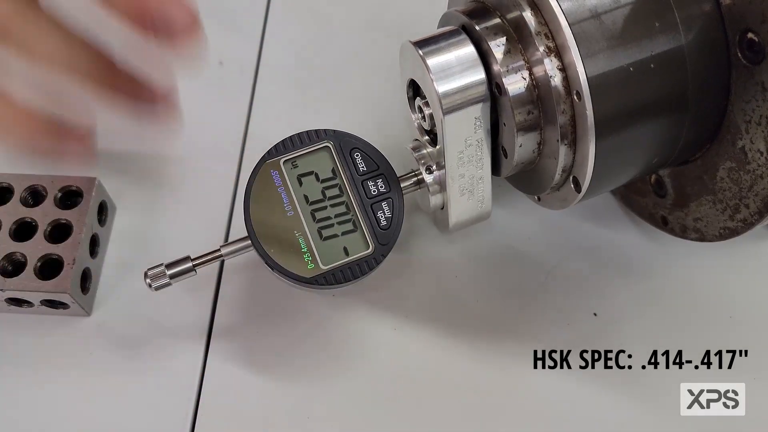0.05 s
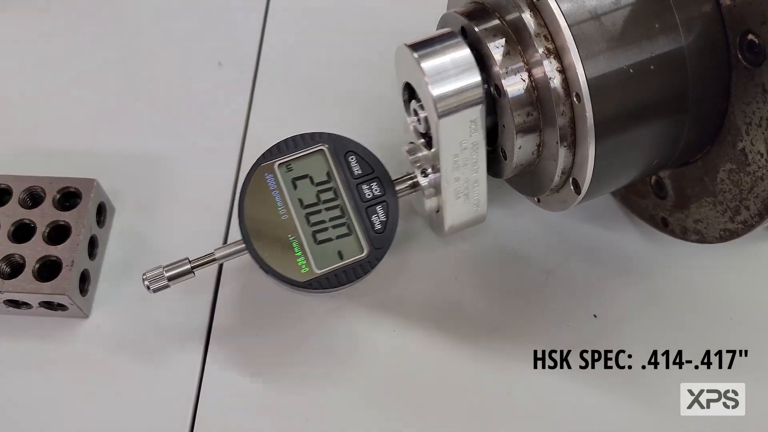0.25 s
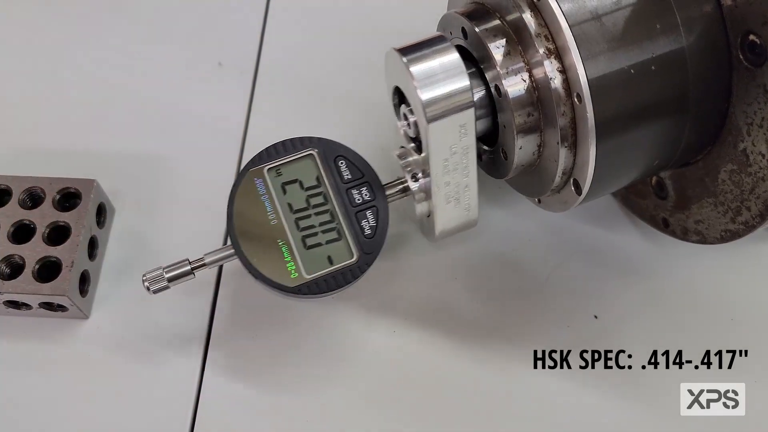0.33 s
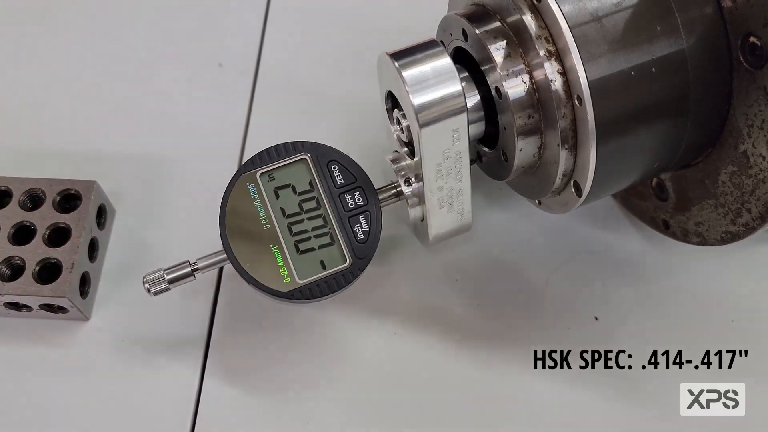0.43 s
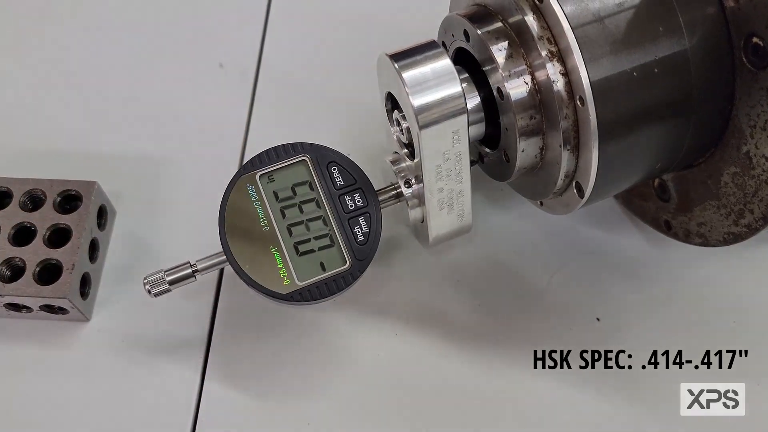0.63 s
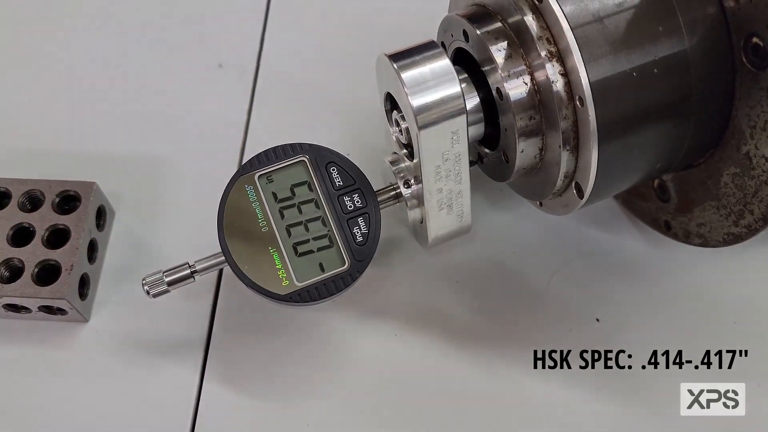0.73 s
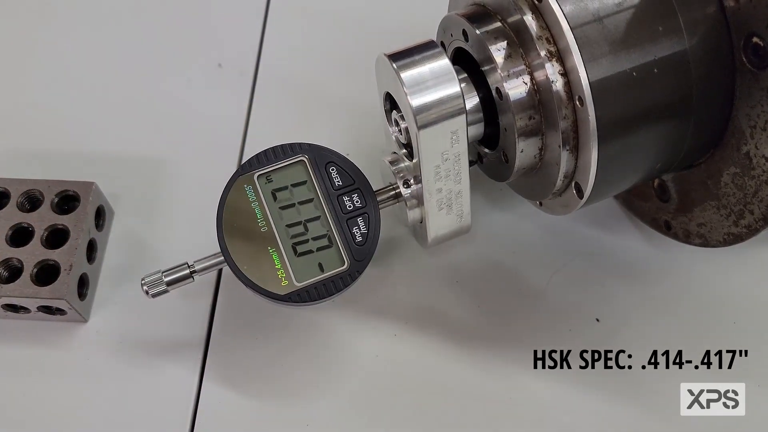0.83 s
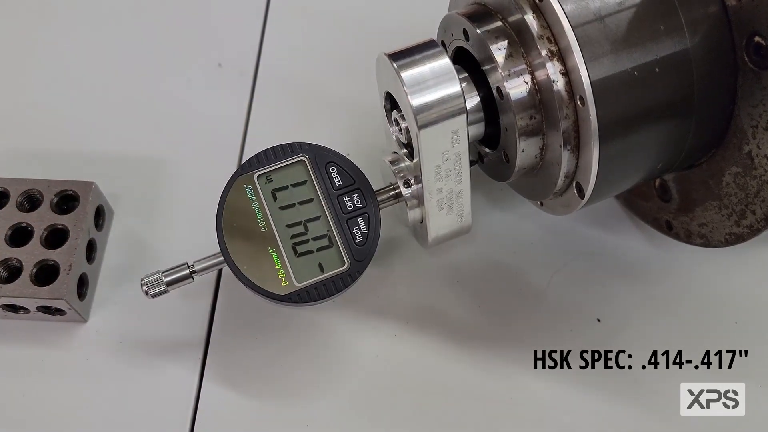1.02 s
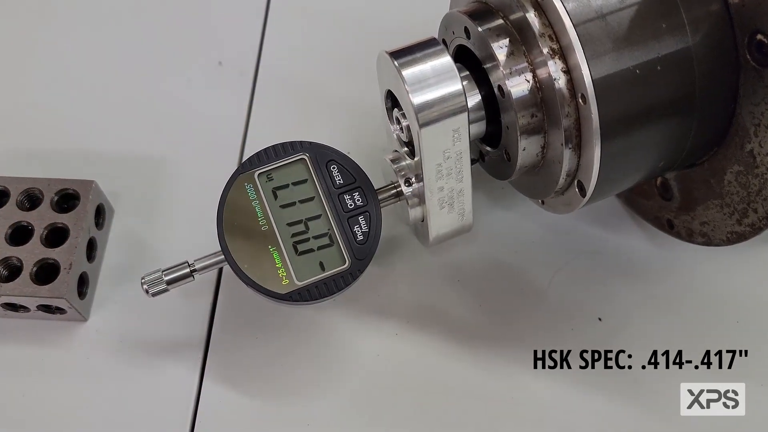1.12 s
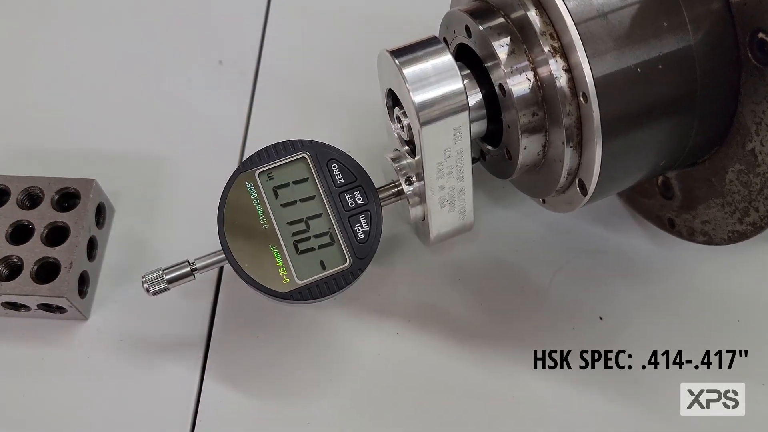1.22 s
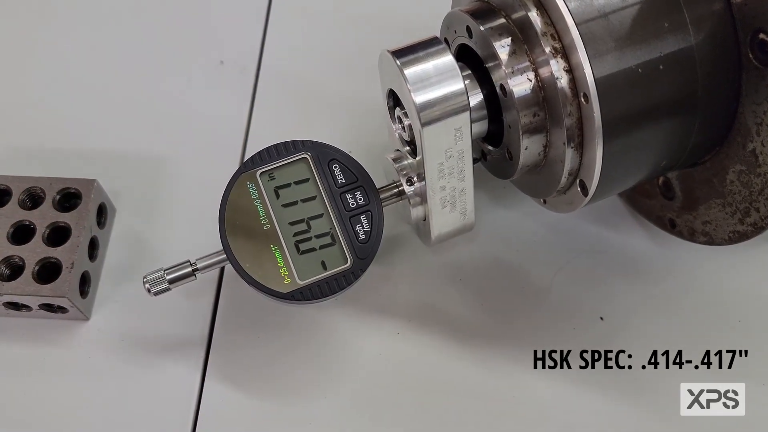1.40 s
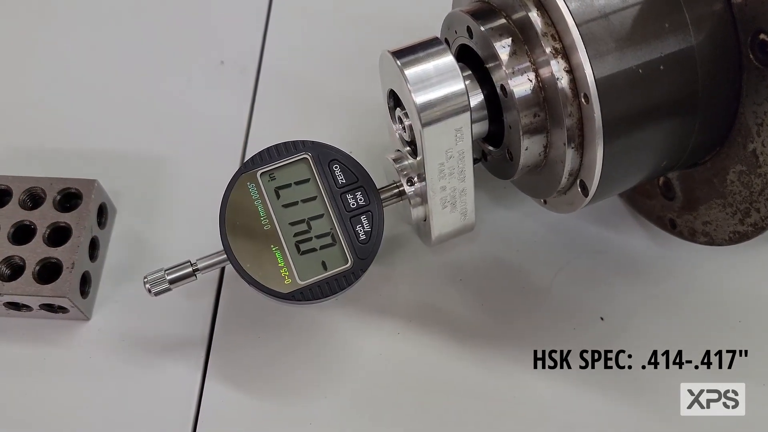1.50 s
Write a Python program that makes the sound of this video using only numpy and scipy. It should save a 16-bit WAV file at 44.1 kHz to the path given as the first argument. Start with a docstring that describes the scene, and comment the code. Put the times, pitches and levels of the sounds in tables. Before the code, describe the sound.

Close stereo pickup of one compressed-air clamp stroke in a quiet workshop; a valve clack and rising hiss lead into a heavy metal bang and rebounds, then a small air spit, a bench knock and low hum.

```python
"""A pneumatic clamp fires once on a workshop bench: a valve clacks, air hisses up, the piston slams home
and rebounds, the exhaust spits and the bench knocks again, while the room rings over a faint hum of machinery.
Air is shaped turbulent noise, thuds and steel strikes are sums of decaying modes, clacks are noise bursts;
bench reflections, a diffuse tail and a steady two-channel background surround them."""
import sys
import numpy as np
from scipy import signal
from scipy.fft import rfft, irfft
from scipy.io import wavfile
from scipy.ndimage import uniform_filter1d

SR = 44100
rng = np.random.default_rng(int(sys.argv[2]) if len(sys.argv) > 2 else 0)


def transcribe(u):
    """Save the signal u as a 16-bit wav file named by the first command-line argument.

    u: samples, shape (n,) or (channels, n), limited to [-1, 1]; the rate is SR.
    q: integer samples, one column per channel.
    """
    v = np.clip(np.atleast_2d(u).T, -1, 1)
    q = np.round(v * 32767).astype(np.int16)
    wavfile.write(sys.argv[1], SR, q)


N = 68355  # length in samples


def gain_of(db):
    """Amplitude ratio of a level: 20 dB is a factor of ten."""
    return 10 ** (np.asarray(db) / 20)


def evened(x):
    """Normalisation to unit rms, so that a level can be set afterwards."""
    return x / np.sqrt(np.mean(x ** 2) + 1e-20)


def read(points, hz):
    """Interpolation of a curve on a logarithmic frequency axis, as pitch is heard."""
    f, value = np.transpose(points)
    return np.interp(np.log(hz + 1), np.log(f + 1), value)


def add(mix, s, sound):
    """Superposition: the sound is summed into the mix from s seconds on."""
    part = mix[round(s * SR):][:len(sound)]
    part += sound[:len(part)]


def noise(colour, size):
    """Spectral shaping: white noise filtered to the given colour, at unit rms."""
    gain = gain_of(read(colour, np.fft.rfftfreq(size, 1 / SR)))
    return evened(irfft(rfft(rng.standard_normal(size)) * gain, size))


def diffuse(db, size):
    """Diffuse field: two partly coherent noises with levels given in bins x frames."""
    # Each row: frequency in Hz, left-right correlation from -1 to 1.
    coherence = [(60, 1), (130, -0.043), (290, 0.2), (640, -0.87), (1410, 0.47), (3100, -0.021),
                 (6820, 0.033), (15000, -0.0)]
    a, b, c, d = rng.standard_normal((db.shape[1], db.shape[0], 4)).T
    same = np.clip(read(coherence, np.fft.rfftfreq(size, 1 / SR)), -1, 1)[:, None]
    left = a + 1j * b
    right = same * left + np.sqrt(1 - same ** 2) * (c + 1j * d)
    z = np.array([left, right])
    return signal.istft(z * gain_of(db), nperseg=size, noverlap=size * 3 // 4)[1]


def workshop():
    """Stationary random background: a wash with slow patches, and narrow-band machine whines."""
    # Spectrum of the wash. Each row: frequency in Hz, relative density in dB per Hz.
    wash_colour = [(20, -32.5), (65, -3.5), (98, -14), (172, -26), (220, -30), (430, -26.5), (700, -16),
                   (1060, -23.5), (1290, -23), (1710, -24), (2100, -20.5), (3000, -24), (7700, -40),
                   (8200, -54), (11200, -51.5), (12000, -42.5), (16000, -44)]
    # Machinery tones. Each row: frequency in Hz, relative level in dB.
    tones = [(360.7, -86), (1227, -83.5), (1335, -84.5), (2040, -89), (2132, -87), (2859, -85.5)]
    wash_db, whines_db = -64.5, -73.5  # overall rms levels
    half_width_hz = 9  # where a whine's amplitude has halved
    hz, frames = np.fft.rfftfreq(4096, 1 / SR), N // 1024 + 5
    patches = uniform_filter1d(rng.standard_normal((frames, len(hz))), size=4, axis=0)
    patches = evened(uniform_filter1d(patches, size=20, axis=1)).T
    wash = diffuse(read(wash_colour, hz)[:, None] + 1.5 * patches, size=4096)[:, :N]
    peaks = sum(gain_of(db) / (1 + ((hz - f) / half_width_hz) ** 4) for f, db in tones)
    whines = diffuse(20 * np.log10(peaks)[:, None] + 0.83 * patches, size=4096)[:, :N]
    return gain_of(wash_db) * evened(wash) + gain_of(whines_db) * evened(whines)


def clacks():
    """Impact transients: broadband noise with a fast onset and exponential decay."""
    # Light clacks. Each row: start in seconds, level in dB, t60 in seconds.
    taps = [(0.0835, -58.5, .05), (0.0915, -53.5, .1), (0.1822, -41, 0.064)]
    # Their spectrum. Each row: frequency in Hz, relative density in dB per Hz.
    tap_colour = [(300, -20.5), (600, -18), (760, -10.5), (1200, -9), (1900, -7), (2400, -10),
                  (4700, -18.5), (7500, -23.5), (9000, -43)]
    out, t = np.zeros(N), np.arange(8192) / SR
    for s, db, t60 in taps:
        onset = np.minimum(t / 0.00085, 1)
        add(out, s, gain_of(db - 60 * t / t60) * onset * noise(tap_colour, len(t)))
    return out


def cracks():
    """Modal excitation: steel striking steel rings short modes, most strongly near the blow's pitch."""
    # Strikes. Each row: start in seconds, level in dB, pitch the blow favours in Hz,
    # narrowness in dB per octave.
    strikes = [(.0875, -59, 790, 30), (.0995, -60, 740, 30), (.2312, -31, 1240, 8), (.2335, -17, 3900, 4),
               (.2350, -17.5, 1250, 9), (.2425, -23, 800, 25), (.2765, -31, 1650, 20),
               (.4932, -40, 1520, 18), (.4962, -34, 830, 34)]
    # Modes of piston and collet. Each row: frequency in Hz, relative level in dB, t60 in seconds.
    steel = [(630, -10, .03), (780, -4, .06), (850, -5, .055), (1005, -2, .035), (1240, -1, .03),
             (1450, -1, .022), (1620, -1, .035), (1850, -3, .04), (2200, -5, .025), (2930, 4, .025),
             (3900, 0, .018), (5500, 2, .014), (7000, -2, .01)]
    out, t = np.zeros(N), np.arange(4096) / SR
    f, mode_db, t60 = np.transpose(steel)[:, :, None]
    for s, db, blow_hz, narrow_db in strikes:
        # every strike varies each mode by about 1 dB and draws its polarity
        luck_db, side = rng.standard_normal((2, len(steel), 1))
        favour_db = -narrow_db * abs(np.log2(f / blow_hz))
        level = db + mode_db + favour_db + luck_db - 60 * t / t60
        modes = gain_of(level) * np.sign(side) * np.sin(2 * np.pi * f * t)
        add(out, s, modes.sum(axis=0))
    return out


def jet():
    """Turbulent jet noise: a gritty hiss that starts dull, brightens as the valve opens, then dies away."""
    # Air flow. Each row: time in seconds, level in dB, treble tilt in dB per octave above 3 kHz.
    flow = [(.181, -55.5, -7), (0.188, -38.5, -6.5), (0.205, -31.5, 1.5), (0.223, -25, 1.5),
            (0.238, -28.5, 0), (.25, -32, 1.5), (0.299, -40, 0.5), (0.391, -52, -1), (0.472, -52.5, -5.5),
            (.6, -100, -11)]
    # Nozzle spectrum ahead of the tilt. Each row: frequency in Hz, relative density in dB per Hz.
    nozzle = [(120, -42), (250, -13.5), (600, -15.5), (800, -4.5), (1300, -5.5), (1750, -5), (3000, -5),
              (4100, -10), (5000, -4), (8800, -7), (10300, -15), (11800, -6.5), (14500, -3), (16000, -13.5)]
    grit_db = 4  # rms of the rapid level fluctuation
    hz, t, z = signal.stft(noise(nozzle, N), SR, nperseg=128)
    s, db, tilt = np.transpose(flow)
    octaves_up = np.log2(np.maximum(hz / 3000, 1))
    z = z * gain_of(np.outer(octaves_up, np.interp(t, s, tilt)))
    flutter = evened(uniform_filter1d(rng.standard_normal(N), size=30))
    level = gain_of(np.interp(np.arange(N) / SR, s, db, left=-200, right=-200))
    return signal.istft(z, SR, nperseg=128)[1][:N] * gain_of(grit_db * flutter) * level


def knocks():
    """Modal resonance: each thud through the housing swells the body modes near its favoured pitch."""
    # Thuds. Each row: start in seconds, level in dB, pitch the blow favours in Hz,
    # narrowness in dB per octave squared, swell time constant in seconds.
    thuds = [(0.1834, -51, 136, 5.5, 0.002), (0.2311, -31, 404, 3.5, 0.00065),
             (0.2368, -10.5, 301.2, 8.5, 0.00071), (0.2551, -21, 194.7, 3, 0.00052),
             (0.277, -19.5, 156, 8, .004), (0.2892, -24.5, 350.4, 14.5, 0.0016),
             (0.3177, -30, 173, 8, .001), (0.4973, -17.5, 253.6, 233, 0.0025),
             (.763, -50, 159.1, 31, 0.0035), (.812, -64, 149.4, 3, 0.0023)]
    # Modes of housing and bench. Each row: frequency in Hz, relative level in dB, t60 in seconds.
    body = [(80, -13.5, 1), (128.55, -10, 0.44), (155, 4.5, 0.12), (199.3, -3.5, 0.13), (246.6, -9.5, 0.19),
            (268, -5.5, 0.071), (302.4, 6.5, 0.053), (364, 6, 0.034), (455, -1.5, 0.094)]
    out, t = np.zeros(N), np.arange(SR // 2) / SR
    for s, db, blow_hz, narrow_db, swell in thuds:
        ring = np.zeros(len(t))
        for f, mode_db, t60 in body:
            most_db = 15 if f < blow_hz else 28  # limit of the loss away from the favoured pitch
            loss_db = min(narrow_db * np.log2(f / blow_hz) ** 2, most_db)
            ring += gain_of(mode_db - loss_db - 60 * t / t60) * np.sin(2 * np.pi * f * t)
        add(out, s, -gain_of(db) * (1 - np.exp(-t / swell)) ** 2 * ring)
    return signal.lfilter(*signal.butter(2, 55, "high", fs=SR), out)


def spits():
    """Turbulent puffs: exhaust air as bright noise under a half-Gaussian pulse."""
    # Puffs. Each row: start in seconds, level in dB, time to fall by 8.7 dB in seconds.
    puffs = [(.4008, -33.5, .0045), (.455, -49, .002), (.4590, -41, .002)]
    # Their spectrum. Each row: frequency in Hz, relative level in dB.
    puff_colour = [(2000, -26), (5500, -6), (10000, -13), (12000, -8), (14500, 0), (16000, 0)]
    out, t = np.zeros(N), np.arange(8192) / SR
    for s, db, length in puffs:
        onset = np.minimum(t / .0005, 1)
        add(out, s, gain_of(db - 8.7 * (t / length) ** 2) * onset * noise(puff_colour, len(t)))
    return out


def ports(x, early_db, share=1):
    """Interaural phase and early reflection: the right port leads, and dense bench echoes follow."""
    # Each row: frequency in Hz, phase by which the right port leads at full share in radians.
    phase_lead = [(60, .15), (150, .3), (330, 1.15), (700, 1.3), (1400, 2.6), (2100, 2.7), (3000, 1.6),
                  (16000, 1.8)]
    early_low_hz, early_s = 1030, 0.0055  # low cut-off and amplitude time constant of the echoes
    size = 2 * N
    lead = np.exp(1j * share * read(phase_lead, np.fft.rfftfreq(size, 1 / SR)))
    direct = np.array([x, irfft(rfft(x, size) * lead, size)[:N]])
    t = np.arange(3000) / SR
    early = rng.standard_normal((2, len(t))) * np.exp(-t / early_s)
    early = signal.lfilter(*signal.butter(2, early_low_hz, "high", fs=SR), early)
    early *= gain_of(early_db) / np.linalg.norm(early[0])
    return direct + signal.fftconvolve(x[None], early, axes=1)[:, :N]


def room(x):
    """Reverberation: convolution with a diffuse tail whose bands each decay at their own rate."""
    # Each row: frequency in Hz, t60 in seconds.
    decay = [(80, 0.57), (140, 0.72), (250, 0.42), (600, 0.94), (1000, 0.24), (1750, 0.44), (4000, 0.71),
             (8000, 0.58), (14000, 0.15)]
    # Each row: frequency in Hz, relative level of the tail in dB.
    tail_colour = [(60, -11), (130, -11.5), (250, -11), (600, -17.5), (1100, -12), (1750, -0.5), (2300, -4),
                   (2900, -3), (4000, -0.5), (9000, -3), (14000, -3)]
    hz, t = np.fft.rfftfreq(512, 1 / SR)[:, None], np.arange(400) * 128 / SR
    t60 = read(decay, hz)
    # longer decays start lower, so t60 leaves a band's energy unchanged
    tail = diffuse(read(tail_colour, hz) - 10 * np.log10(t60) - 60 * t / t60, size=512)
    build_up = np.minimum(np.arange(tail.shape[1]) / SR / 0.079, 1)
    tail *= build_up * 0.00095
    return signal.fftconvolve(x[None], tail, axes=1)[:, :N]


def scene():
    """Superposition of direct, reflected and reverberant sound with the background."""
    near = jet() + knocks()
    sharp = clacks() + spits() + cracks()
    spread = gain_of(1) * np.array([jet(), jet()])  # turbulence that each port hears alone
    direct = ports(near, early_db=3) + ports(sharp, early_db=-9, share=.7)
    return direct + spread + room(near + sharp + spread[0]) + workshop()


def record(dry):
    """Linear colouring and soft saturation: the ports differ in colour, peaks flatten, the top is cut."""
    # Each row: frequency in Hz, left minus right in dB.
    balance = [(60, -2.5), (110, 1), (200, -1), (380, 2.5), (700, -3.5), (1290, 3.5), (2380, 2.5),
               (4400, -4), (8120, 4), (15000, 3)]
    edge_hz, ceiling = 15800, .92  # ceiling in amplitude
    half = read(balance, np.fft.rfftfreq(2 * N, 1 / SR)) / 2
    tinted = irfft(rfft(dry, 2 * N) * gain_of([half, -half]), 2 * N)[:, :N]
    flattened = tinted / (1 + (abs(tinted) / ceiling) ** 6) ** (1 / 6)
    low_pass = signal.firwin(511, edge_hz, window=("kaiser", 9), fs=SR)
    return signal.oaconvolve(flattened, low_pass[None], "same")


dry = scene()
out = record(dry)
transcribe(out)
```